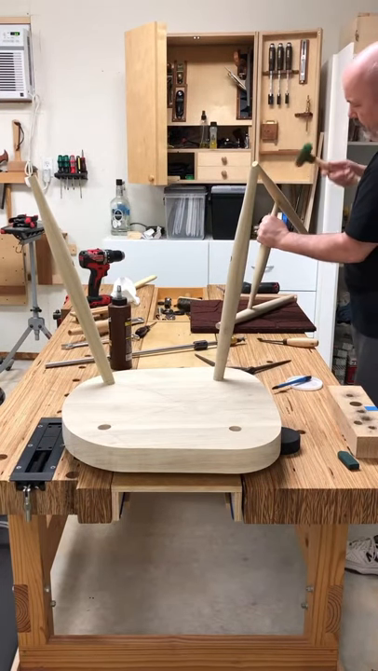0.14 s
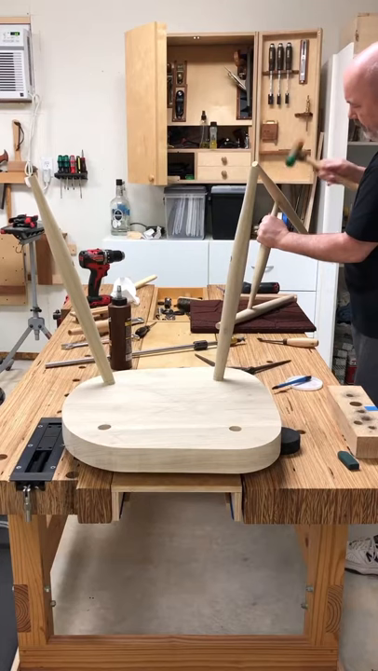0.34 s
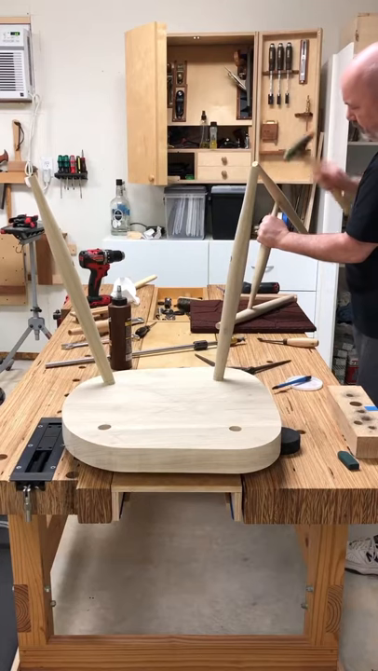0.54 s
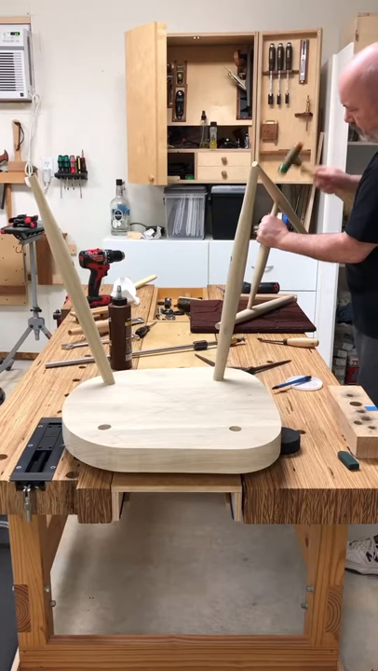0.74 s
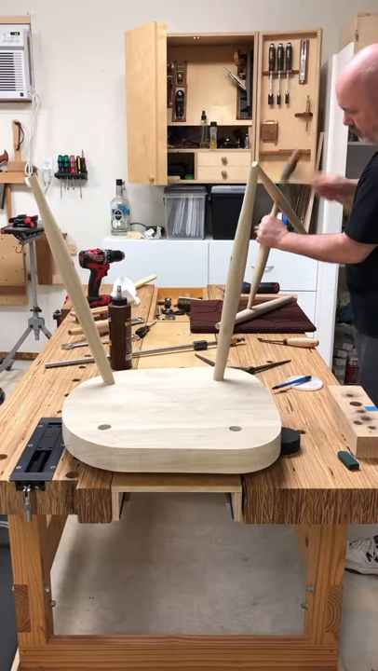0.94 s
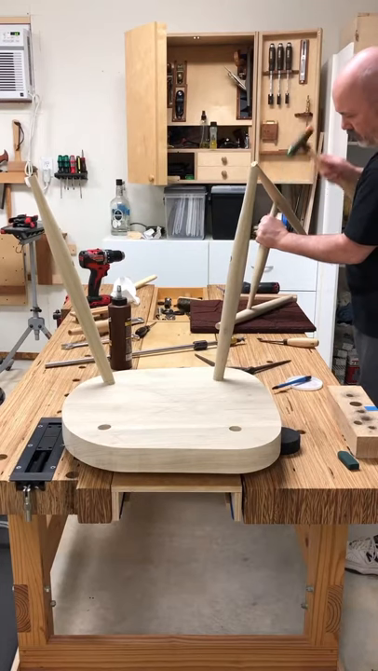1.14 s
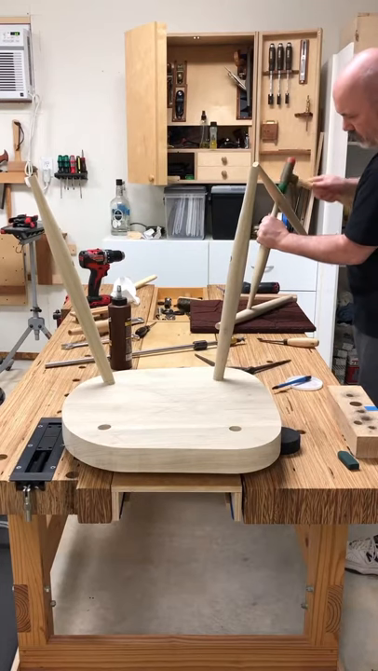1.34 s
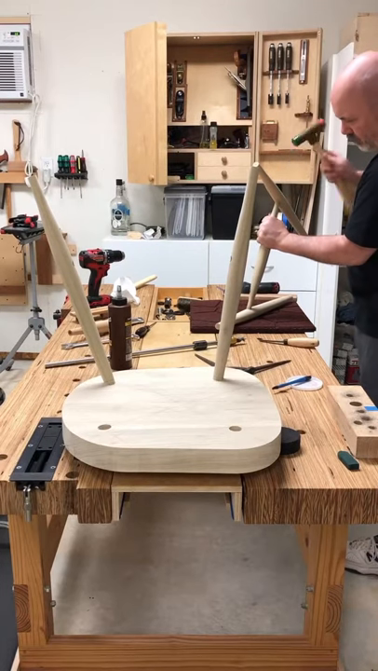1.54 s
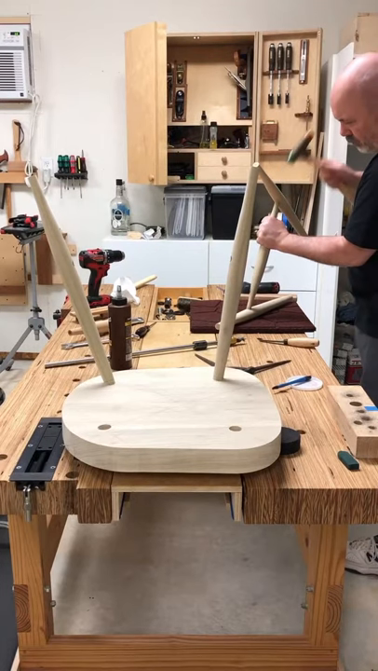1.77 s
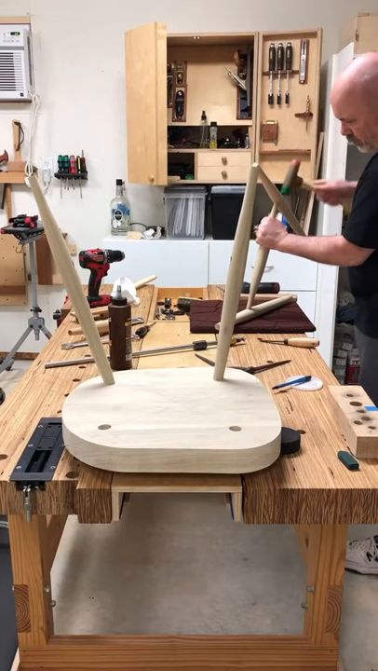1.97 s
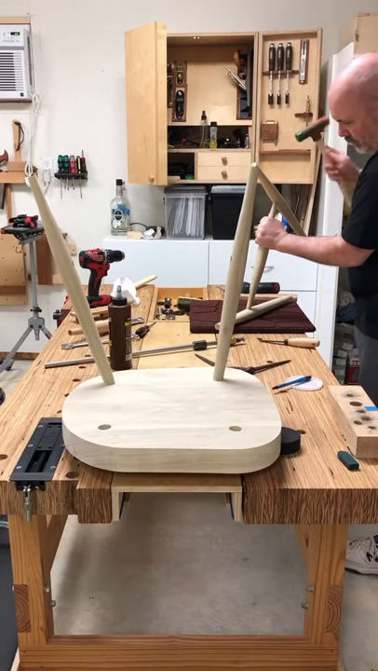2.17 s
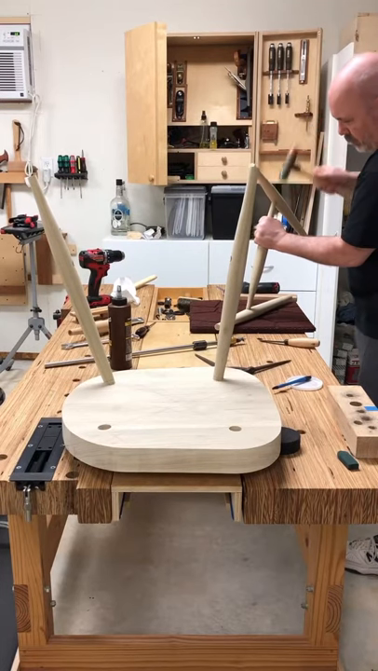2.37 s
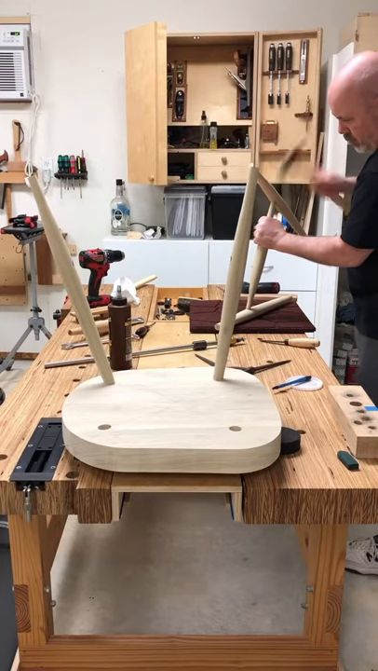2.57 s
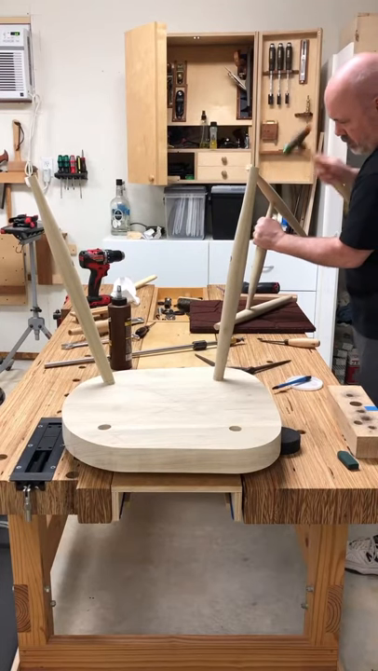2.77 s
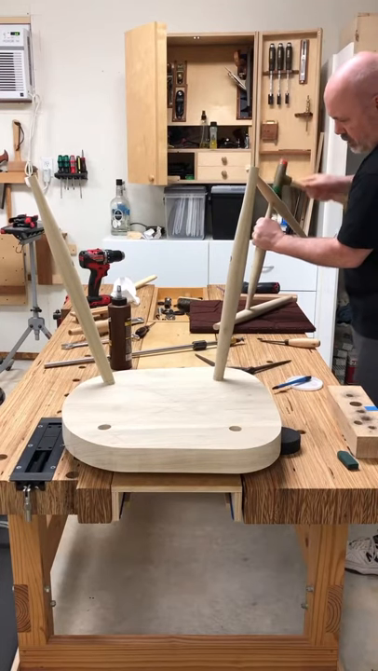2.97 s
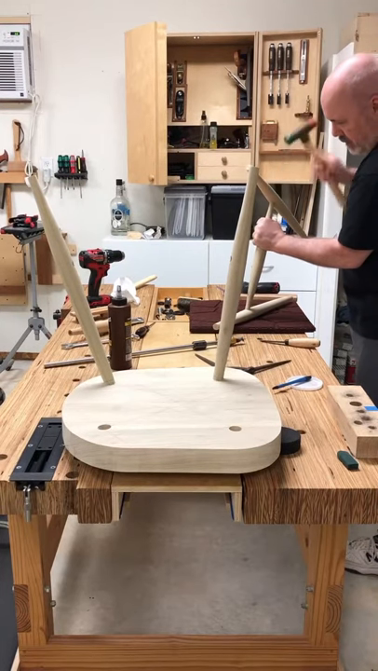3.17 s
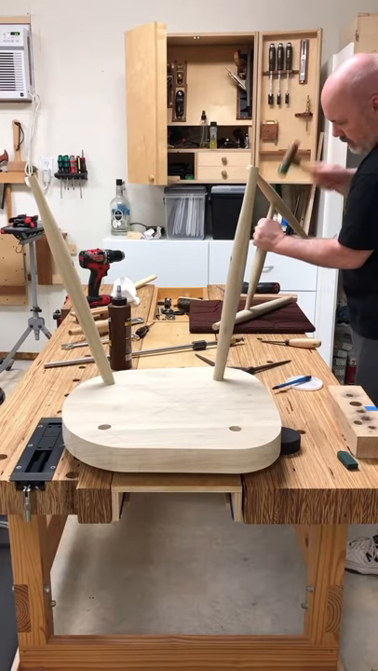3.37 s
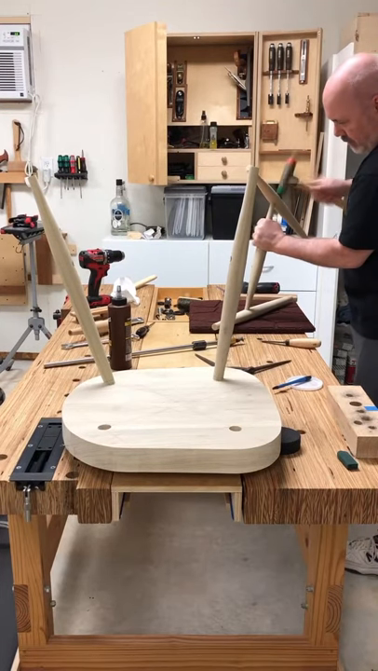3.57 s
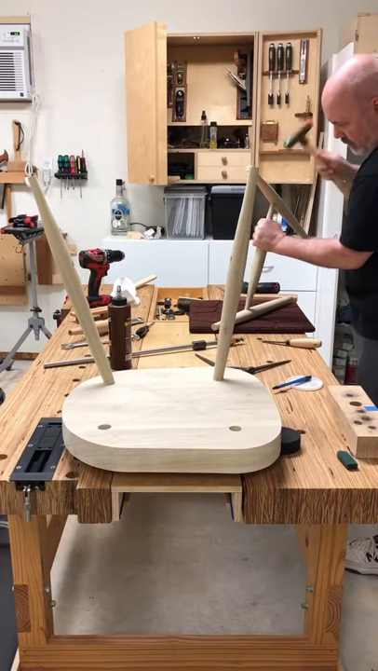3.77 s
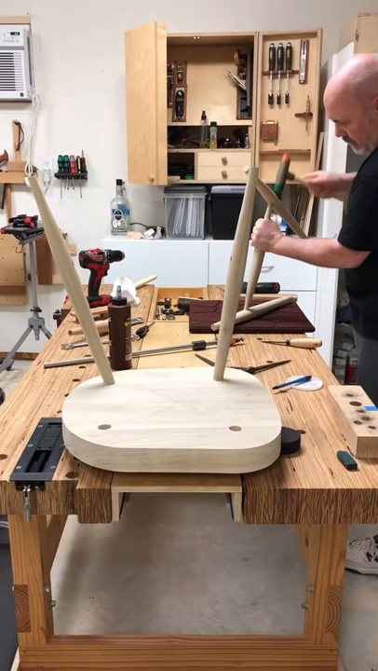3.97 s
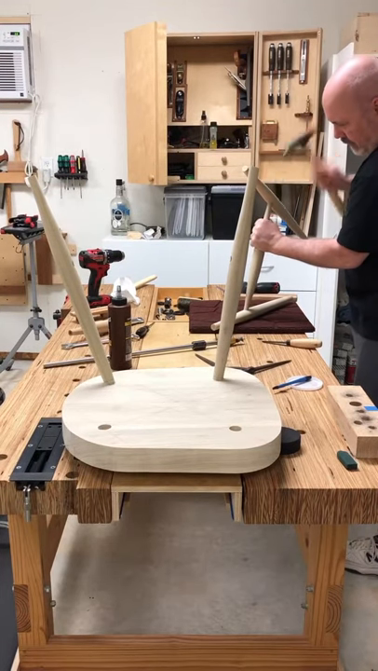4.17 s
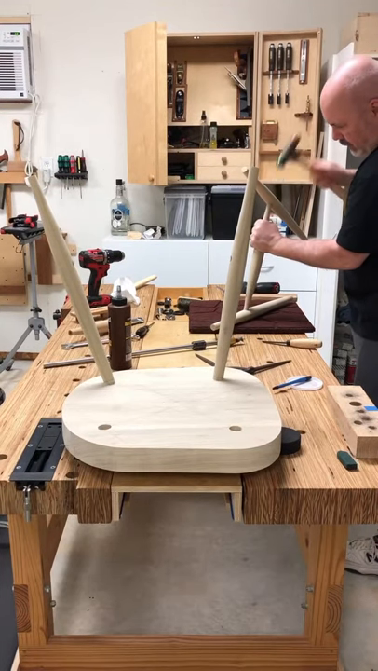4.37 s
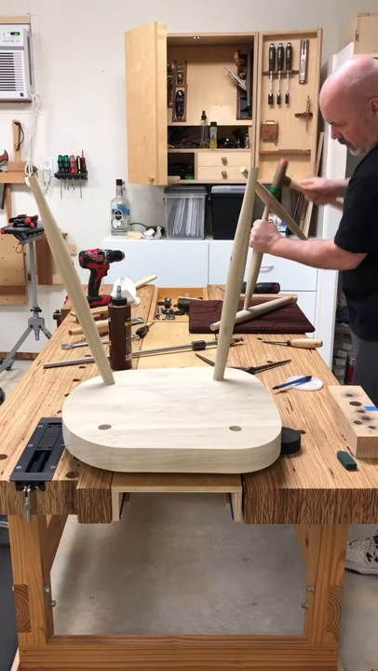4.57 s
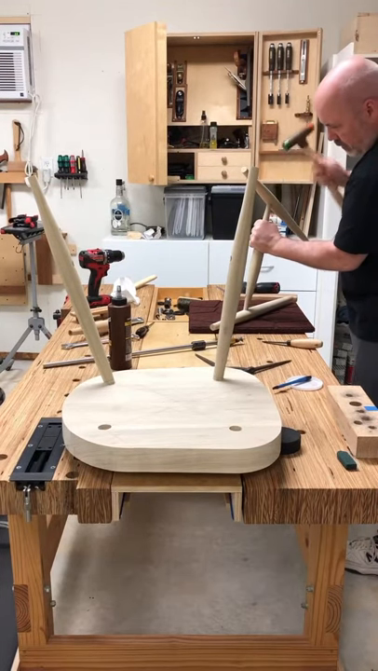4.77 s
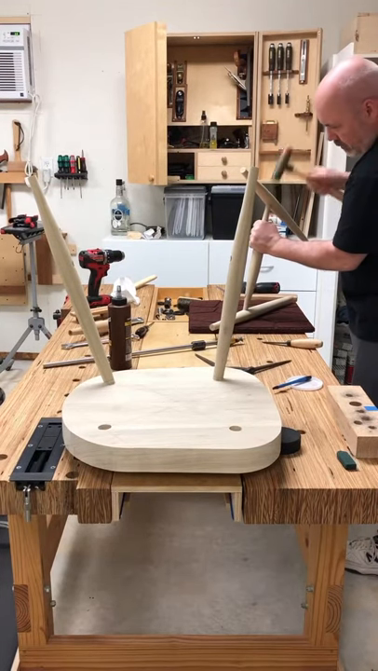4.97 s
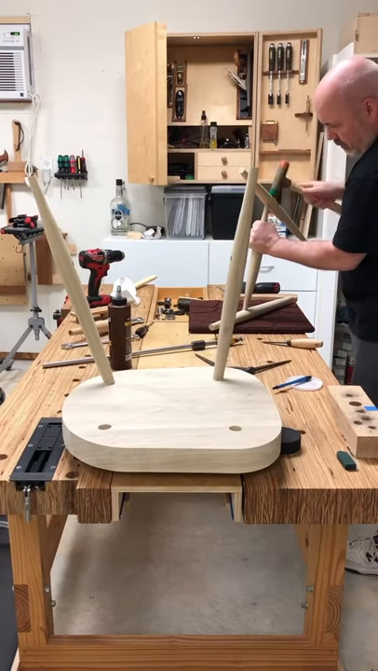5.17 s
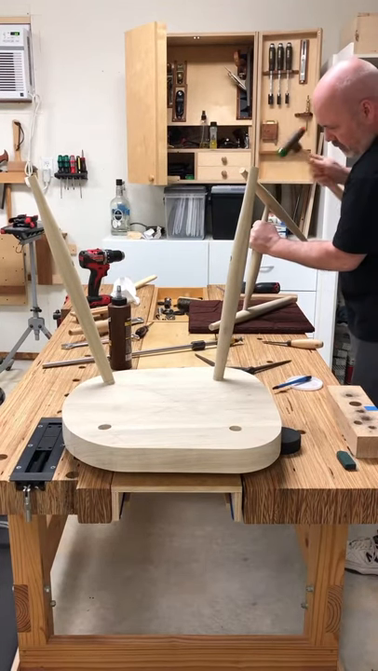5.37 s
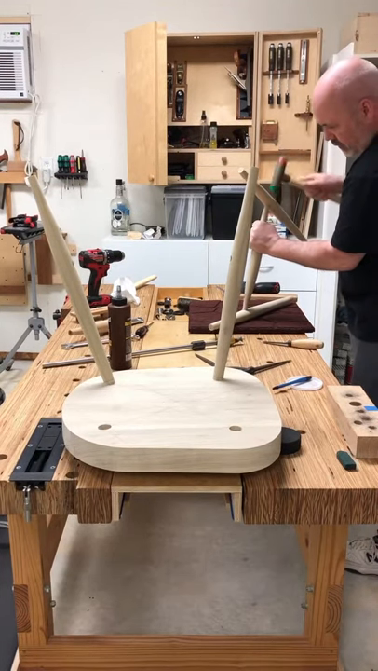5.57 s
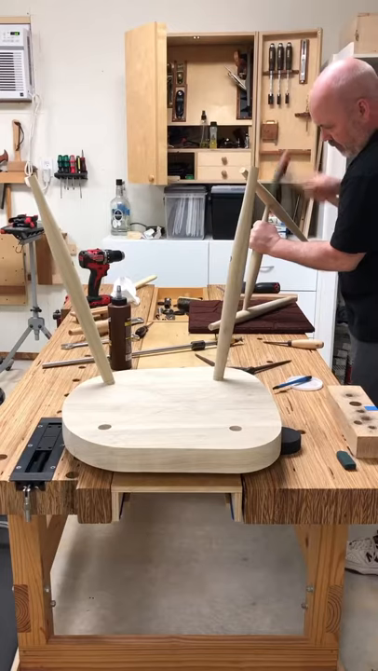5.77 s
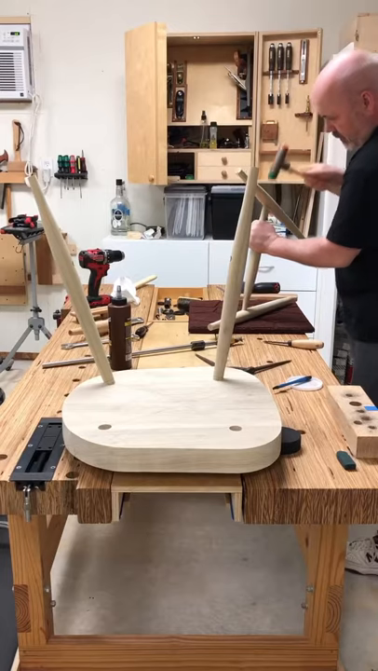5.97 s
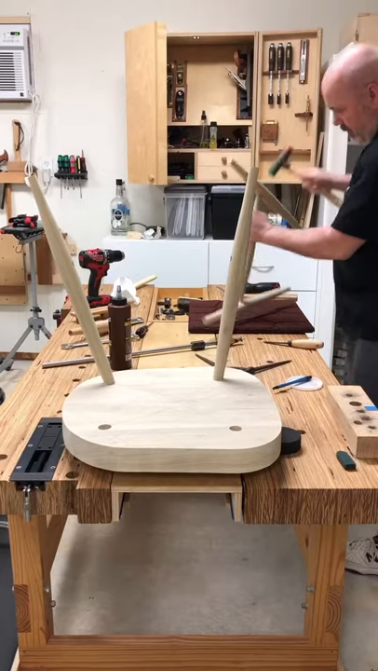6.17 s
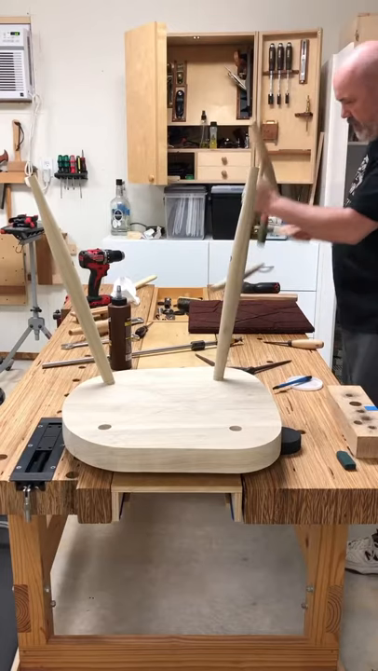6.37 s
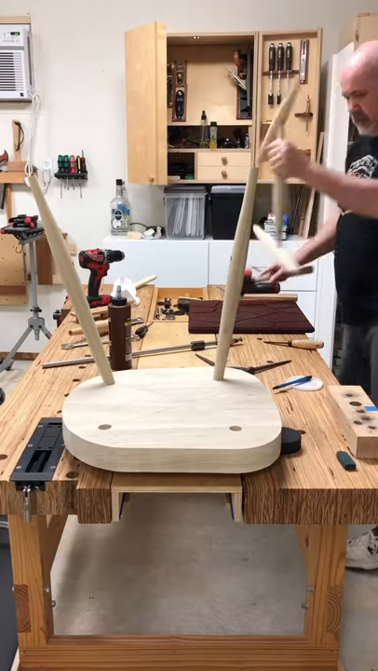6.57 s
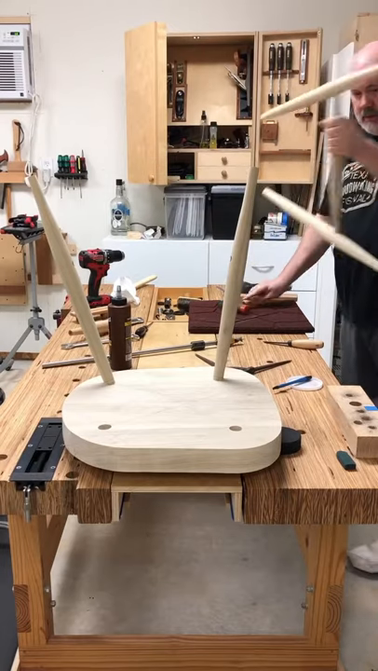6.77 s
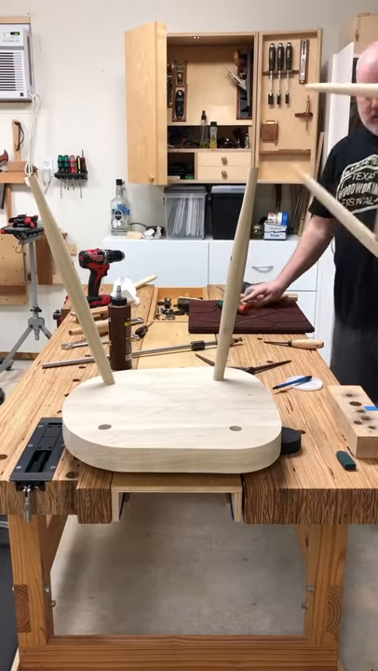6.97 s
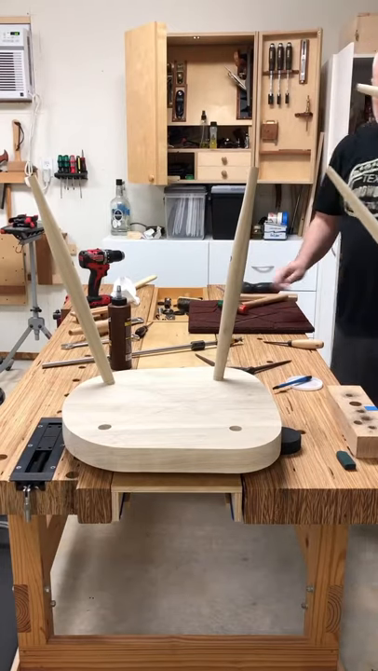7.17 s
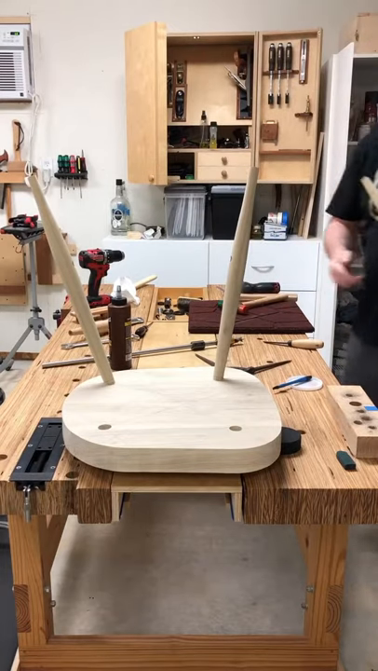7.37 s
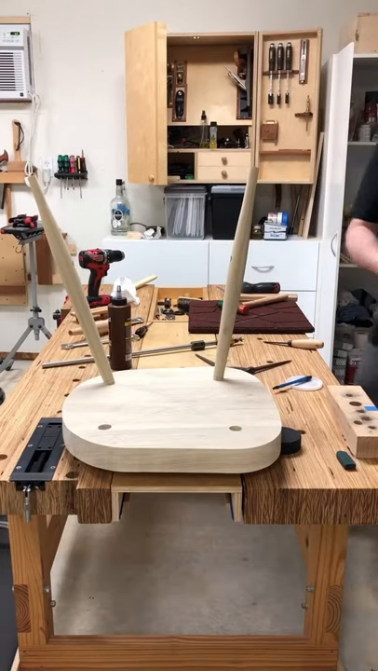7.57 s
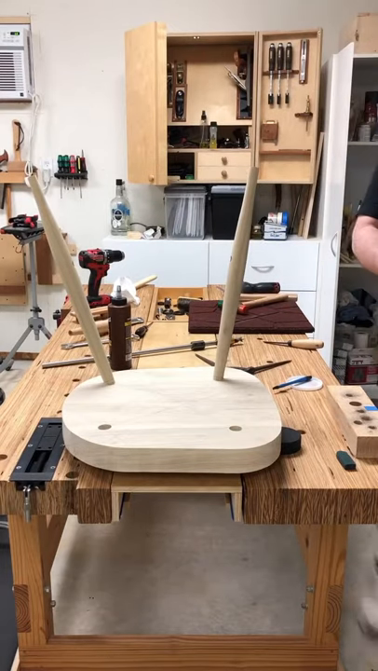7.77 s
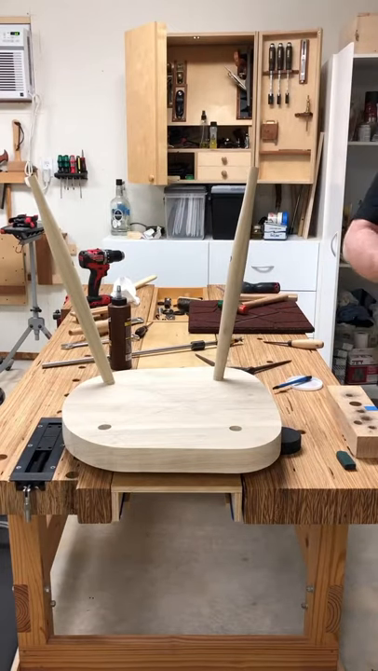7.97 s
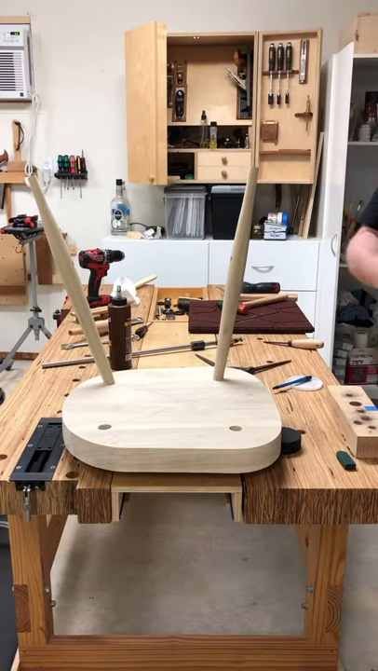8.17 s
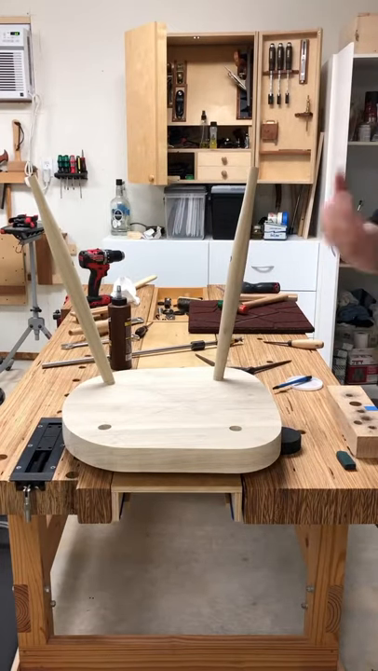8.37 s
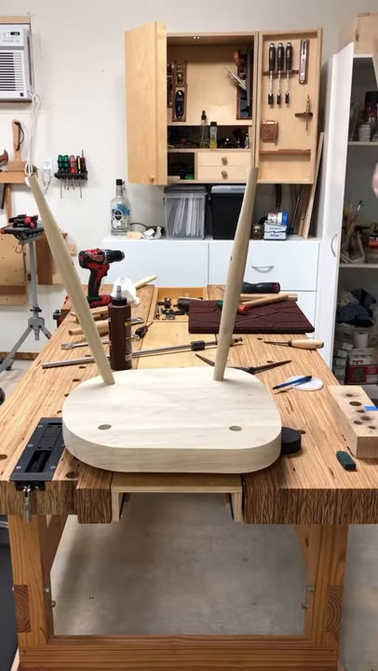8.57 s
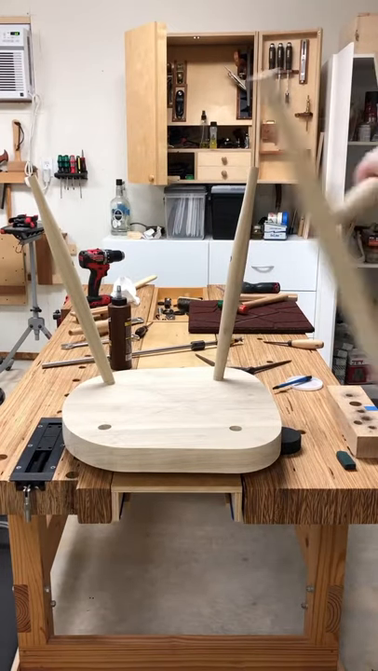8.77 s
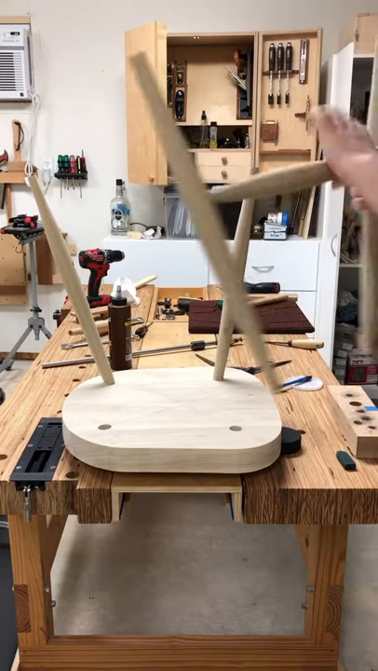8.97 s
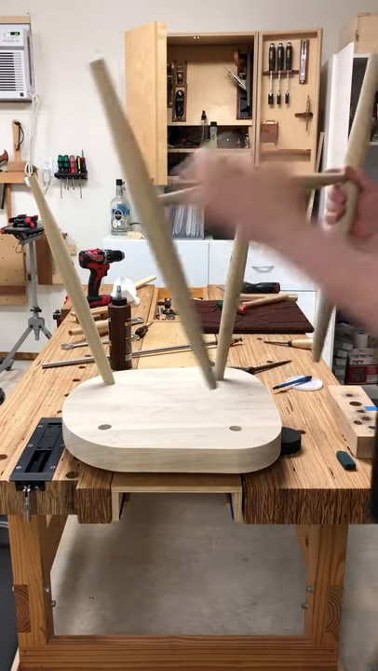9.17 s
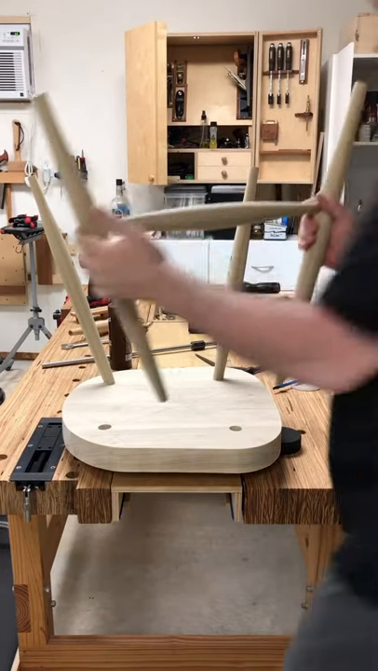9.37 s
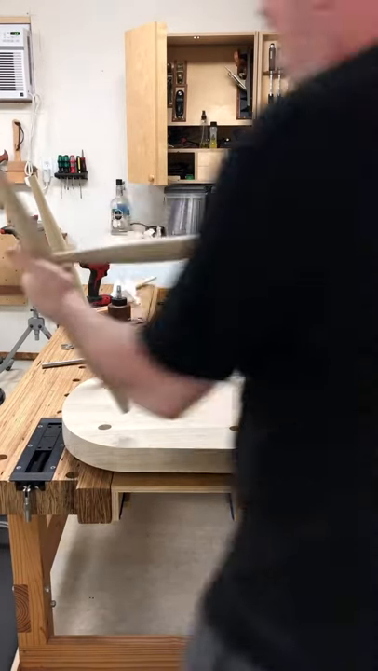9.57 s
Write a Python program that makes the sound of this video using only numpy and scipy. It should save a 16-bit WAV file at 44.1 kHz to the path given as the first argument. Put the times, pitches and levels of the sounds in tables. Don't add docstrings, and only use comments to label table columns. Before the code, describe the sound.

A mallet pounds a chair joint in a live workshop, seventeen steady heavy blows with loose tools rattling, then a soft set-down and light rubs.

```python
import sys
import numpy as np
from scipy import signal
from scipy.io import wavfile

SR = 44100
rng = np.random.default_rng(int(sys.argv[2]) if len(sys.argv) > 2 else 0)


def generate_wav(signal):
    frames = np.transpose(np.atleast_2d(signal))
    scaled = np.clip(frames, -1, 1) * 32767
    pcm = np.round(scaled).astype(np.int16)
    wavfile.write(sys.argv[1], SR, pcm)


def boost_factor(decibels):
    exponent = np.asarray(decibels, float) / 20
    return 10 ** exponent


N = 425124


def rms_one(x):
    return x / np.sqrt(np.mean(x ** 2) + 1e-20)


def at_hz(points, hz):
    table_hz, values = np.array(points).T
    return np.interp(np.log(hz), np.log(table_hz), values)


def clicks(times_s, sizes):
    out = np.full(N, 1e-18)
    np.add.at(out, (np.asarray(times_s) * SR).astype(int), sizes)
    return out


def ring(x, hz, t60_s):
    radius = boost_factor(-60 / (t60_s * SR))
    angle = 2 * np.pi * hz / SR
    return signal.lfilter([0, np.sin(angle)], [1, -2 * radius * np.cos(angle), radius * radius], x)


def butter(x, hz, kind):
    return signal.sosfilt(signal.butter(2, hz, kind, fs=SR, output="sos"), x)


def decay(x, tau_s):
    return signal.lfilter([1], [1, -np.exp(-1 / (tau_s * SR))], x)


def through(x, response):
    return signal.fftconvolve(x, response)[:N]


def noise_bands(spectrum, size, shape):
    white = rng.standard_normal((2, size))
    edges_hz = 35 * 2 ** np.arange(0, 9.3, .5)
    middles_hz = np.sqrt(edges_hz[1:] * edges_hz[:-1])
    out = 0
    for k, hz in enumerate(middles_hz):
        band = butter(white[k % 2], edges_hz[k:k + 2], "band")
        out = out + boost_factor(at_hz(spectrum, hz)) * shape(hz) * band
    return out


def echoes(spectrum, rise_s):
    # pitch_hz, t60_s
    room_decay = [(80, 0.28), (210, 0.74), (560, 0.73), (1470, 0.76), (3880, 0.65), (8000, 0.48),
                  (15000, 0.27)]
    t = np.arange(SR) / SR
    tail = noise_bands(spectrum, SR, lambda hz: boost_factor(-60 * t / at_hz(room_decay, hz)))
    tail = tail * (1 - np.exp(-t / rise_s))
    return tail / np.sqrt(np.sum(tail ** 2))


def hops(effort, per_s, fall_s, spread_db):
    heights_db = spread_db * np.minimum(rng.exponential(1, N), 4)
    sizes = boost_factor(heights_db) * rng.choice([-1, 1], N)
    landed = rng.random(N) < per_s / SR
    swell = decay(effort, fall_s) - decay(effort, 0.0068)
    return swell * sizes * landed


def struck(landings, modes):
    dealt = rng.integers(0, len(modes), N)
    out = 0
    for k, (hz, db, t60_s) in enumerate(modes):
        out = out + boost_factor(db) * ring(landings * (dealt == k) + 1e-18, hz, t60_s)
    return out


def machines():
    # pitch_hz, level_db (rms)
    hum_lines = [(57.9, -44), (115.7, -55), (120.0, -52), (173.5, -47), (240.1, -43), (289.2, -58),
                 (480.0, -59)]
    # pitch_hz, level_db (per Hz)
    fan_spectrum = [(28, -35), (55, -2), (124, -17.5), (243, -3), (380, -7.5), (1700, -15), (7600, -38.5),
                    (15500, -47.5)]
    fan_db = -44.5
    t = np.arange(N) / SR
    out = boost_factor(fan_db + 1.5) * rms_one(noise_bands(fan_spectrum, N, lambda hz: 1))
    for hz, db in hum_lines:
        waver = rms_one(decay(decay(rng.standard_normal(N), 0.017), 0.017))
        tone = np.sqrt(2) * np.sin(2 * np.pi * (hz * t + rng.random()))
        out += boost_factor(db + 0.42 * waver) * tone
    return out


def crack(s, crack_db):
    touched_s = s - .0023
    slap = np.exp(-np.arange(round(0.004 * SR)) / (0.0017 * SR))
    burst = through(clicks(touched_s, boost_factor(crack_db + 1.5)), slap) * rng.standard_normal(N)
    bright = butter(burst, [3800, 9500], "band")
    tail = through(bright, echoes([(100, 11.0), (16000, -13.0)], rise_s=0.00045))
    return bright + boost_factor(2.5) * tail


def boom(s, boom_db, thud_db):
    # pitch_hz, level_db, t60_s, push 1 or pull -1 toward the microphone
    bench_modes = [(96, -14, 0.2, 1), (112, -6, 0.2, 1), (126, 3.5, 0.18, -1), (152, -11, 0.1, 1),
                   (172, -12, 0.2, 1), (184, -3, 0.17, 1), (202, -5, 0.3, -1), (219, 5, 0.16, 1),
                   (240, -16, 0.6, -1), (264, -6, 0.14, -1), (280, -16, 0.39, -1), (287, 3, 0.3, -1),
                   (297, -11, 0.5, 1), (332, -6, 0.25, 1)]
    # pitch_hz, level_db, t60_s, push 1 or pull -1
    upper_bench_modes = [(351, -3, 0.23, -1), (389, -12, 0.45, 1), (470, -17, 0.4, 1), (492, -1, 0.26, -1),
                         (500, -15, 0.7, -1), (544, -6, 0.26, 1), (562, -9, 0.21, 1), (614, -8, 0.1, 1),
                         (687, -8, 0.09, 1), (714, -10, 0.3, -1), (760, -5, 0.15, 1), (810, -10, 0.15, -1),
                         (850, -7, 0.16, 1)]
    # pitch_hz, level_db (per Hz)
    thud_spectrum = [(60, -48), (110, -20), (200, -3), (420, -5), (984, -13), (1900, -18.5), (2900, -30),
                     (8000, -39)]
    modes = bench_modes + upper_bench_modes
    uneven_db = rng.normal(0, 1.5, (len(s), len(modes)))
    wood = 0
    for (hz, db, t60_s, sign), chance_db in zip(modes, uneven_db.T):
        wood = wood + sign * ring(clicks(s, boost_factor(boom_db + db + chance_db - 12)), hz, t60_s)
    push = clicks(s - .001, boost_factor(thud_db + 22))
    slip = .08 * decay(push, .012) * rng.standard_normal(N)
    drive = butter(push, 673, "low") + butter(slip, 537, "high")
    thud = through(drive, echoes(thud_spectrum, rise_s=0.0013))
    return butter(wood, 2100, "low") + butter(butter(thud, 95, "high"), 95, "high")


def clatter(s, clatter_db):
    # pitch_hz, level_db, t60_s
    spindle_modes = [(620, -3, .04), (790, 0, .05), (850, -1, .04), (1060, -2, .04), (1170, -1, .04),
                     (1330, -3, .03), (1530, -4, .03), (1780, -4, .03), (1910, -9, .04), (2400, -12, .015),
                     (2900, -10, .02), (3150, -10, .02), (3700, -13, .015)]
    effort = clicks(s + 0.0067, boost_factor(clatter_db - 6.5))
    landings = hops(effort, per_s=2500.0, fall_s=0.032, spread_db=4.0)
    wood = boost_factor(-5) * struck(landings, spindle_modes) + boost_factor(13) * butter(landings, [600, 5000], "band")
    return wood + boost_factor(3) * through(wood, echoes([(100, 1.0), (16000, -4.0)], rise_s=0.0089))


def rattle(s, rattle_db):
    # pitch_hz, level_db, t60_s
    tool_modes = [(4460, -5, .06), (5300, -10, .05), (5600, -9, .06), (6524, -8, .07), (7760, -5, .06),
                  (9310, -6, .05), (9940, -5, .06), (10600, -7, .07), (12100, -2, .07), (12835, -6, .04),
                  (13200, -8, .06), (13800, -12, .05), (15000, -7, .06), (15300, -9, .05)]
    # pitch_hz, level_db (per Hz)
    rattle_spectrum = [(1180, -6), (2000, 1), (2280, -5.5), (5830, -27.5), (9580, 5), (11100, -18),
                       (12500, -30), (16000, -67)]
    effort = clicks(s + 0.007, boost_factor(rattle_db))
    landings = hops(effort, per_s=4200.0, fall_s=0.024, spread_db=0.5)
    close = boost_factor(7) * butter(landings, [3000, 15000], "band")
    wet = boost_factor(7.0) * through(landings, echoes(rattle_spectrum, rise_s=0.0072))
    steel = boost_factor(-10.5) * struck(hops(effort, per_s=1500.0, fall_s=0.03, spread_db=3.0), tool_modes)
    steel_tail = boost_factor(-3) * through(steel, echoes([(100, 0), (16000, -1)], rise_s=.005))
    return close + wet + steel + steel_tail


def clinks():
    # start_s, level_db, pitch_hz
    touches = [(.70, -45, 12150), (.745, -48, 7700), (1.40, -37, 12150), (1.445, -40, 7800),
               (2.675, -27, 5290), (2.699, -35, 5330), (3.35, -36, 12150), (3.355, -24, 7800),
               (3.405, -50, 7800), (3.49, -39, 6520), (3.672, -22, 7650), (3.675, -24, 9940),
               (3.68, -21, 12830), (3.70, -24, 7860), (3.815, -35, 6630), (4.63, -23, 7770),
               (5.59, -39, 7760), (5.994, -32, 5930), (5.997, -34, 8820)]
    rings = 0
    for s, db, hz in touches:
        t60_s = 0.34 * (7000 / hz) * 2 ** (-(db + 43.5) / 11.0)
        rings = rings + ring(clicks([s], boost_factor(db)), hz, t60_s)
        rings = rings + ring(clicks([s], boost_factor(db - 6)), hz * 1.006, t60_s)
    return rings + boost_factor(-6) * through(rings, echoes([(100, 0), (16000, -1)], rise_s=.005))


def knocks():
    # start_s, level_db, pitch_hz
    bumps = [(.708, -18, 2920), (.712, -6, 1300), (.76, -18, 3050), (1.064, -10, 1490), (1.066, -27, 3760),
             (1.141, -12.5, 1966), (1.142, -23, 4200), (5.275, -20, 3200), (5.59, -23, 2900),
             (7.999, -36, 2300), (8.9668, -21.5, 635), (9.1735, -20.5, 750), (9.174, -21.5, 330),
             (9.514, -36, 1900), (9.535, -39, 2800)]
    # pitch_hz, level_db, t60_s
    mallet_modes = [(120, -24, 0.21), (190, -27, .07), (260, -25, 0.073), (400, -34, 0.067),
                    (514, -25.5, 0.074), (840, -30, 0.024), (1200, -30, 0.025)]
    mallet_down_s, settle_s = 6.852, 0.00084
    rings = 0
    for s, db, hz in bumps:
        t60_s = 0.012 * (1000 / hz) ** 0.087
        rings = rings + ring(clicks([s], -boost_factor(db)), hz, t60_s)
    top_hz = mallet_modes[-1][0]
    for hz, db, t60_s in mallet_modes:
        s = mallet_down_s + settle_s * np.log2(top_hz / hz) ** 2
        rings = rings + ring(clicks([s], -boost_factor(db)), hz, t60_s)
    room = echoes([(100, -8), (400, -6), (16000, -10)], rise_s=0.004)
    return rings + boost_factor(2.5) * through(butter(rings, 980, "high"), room)


def slides():
    # start_s, level_db (rms), length_s, lowest_hz
    strokes = [(7.938, -49, 0.038, 3900), (7.97, -39, 0.029, 1500), (7.963, -51, 0.046, 4500),
               (8.03, -63, .05, 4500), (8.41, -62, .008, 3500), (8.52, -54, .03, 4500),
               (8.546, -54, 0.023, 5000), (8.6, -63, .04, 6000), (8.66, -56, .05, 4500),
               (8.744, -54, .027, 5500), (8.964, -44.5, 0.026, 3200), (8.968, -54, 0.028, 7500),
               (9.147, -47, 0.019, 4740), (9.15, -62, .022, 9000), (9.337, -59, 0.0064, 7500),
               (9.515, -45, .028, 2820), (9.504, -47, .035, 5960), (9.56, -62, .05, 5000)]
    out = np.zeros(N)
    grain = rng.standard_normal(N) * boost_factor(6.6 * rng.standard_normal(N))
    for s, db, length_s, low_hz in strokes:
        at, size = round(s * SR), round(length_s * 2.24 * SR)
        swell = np.hanning(size) ** 2
        high_hz = min(low_hz * 2.63, 15000)
        hiss = butter(grain[at:at + size], [low_hz, high_hz], "band")
        out[at:at + size] += boost_factor(db) * rms_one(hiss) * swell[:len(hiss)]
    return out + boost_factor(-10) * through(out, echoes([(100, 0), (16000, -3)], rise_s=.008))


def scene():
    # start_s, force_db, loose_db (how freely things hop), square_db (squareness of the face)
    blows = [(0.6799, -7, -6, -4), (1.0362, -5.5, 0, -1), (1.3789, -3.5, -2.5, 3), (1.7065, 0, 0.5, 5),
             (2.0279, -1.5, -0.5, 2), (2.3499, -1.5, 0, 0), (2.6723, -7, -23, 10), (2.9977, 0, 0, 7),
             (3.3245, 3, 3, 2), (3.6585, -1, 3, 4), (3.9755, 0.5, 2.5, 4.5), (4.3023, -1, -2, 7),
             (4.614, -0.5, 2, 2), (4.9258, -0.5, -1, 3.5), (5.2423, -0.5, 1.5, 6), (5.5535, -1, 2, 0),
             (5.8664, -2.5, 1.5, 5)]
    s, force_db, loose_db, square_db = np.transpose(blows)
    crack_db = -15.5 + force_db + square_db
    thud_db = 0.85 + 0.4 * force_db
    rattle_db = -16.5 + loose_db
    clatter_db = -18 + np.maximum(0.98 * loose_db, -5) - 0.16 * square_db
    hits = crack(s, crack_db) + boom(s, force_db, thud_db)
    loose = clatter(s, clatter_db) + rattle(s, rattle_db) + clinks()
    return (machines() + hits + loose + knocks() + slides())[None]


def band_limit(x):
    return signal.sosfilt(signal.butter(12, 16450, fs=SR, output="sos"), x)


def record(dry):
    clipped = np.clip(butter(dry, 50, "high"), -1, 1)
    top_cut = signal.cheby2(22, 60, 15920, fs=SR, output="sos")
    return band_limit(signal.sosfilt(top_cut, clipped))


dry = scene()
out = record(dry)
generate_wav(out)
```